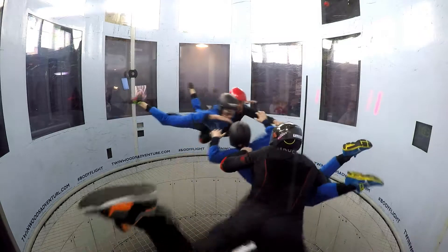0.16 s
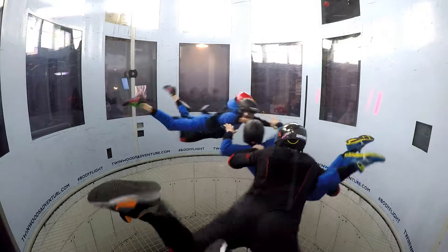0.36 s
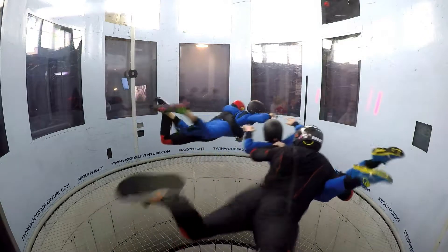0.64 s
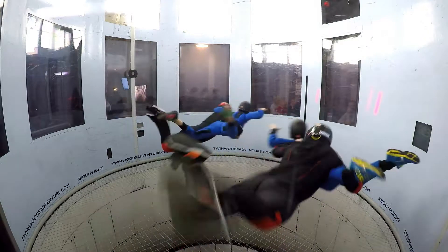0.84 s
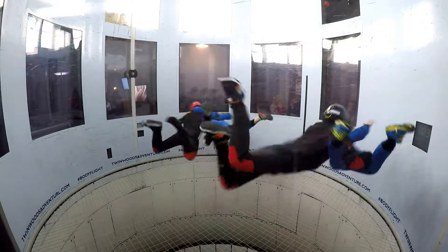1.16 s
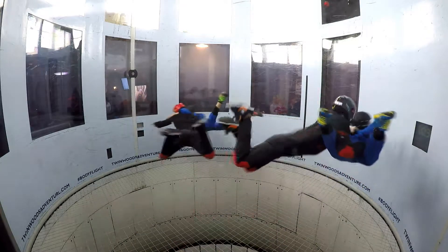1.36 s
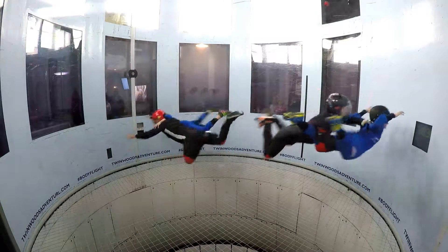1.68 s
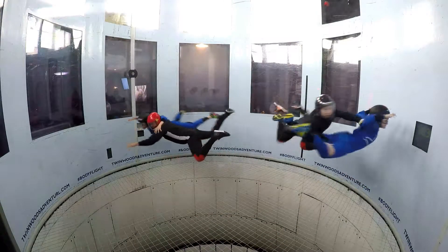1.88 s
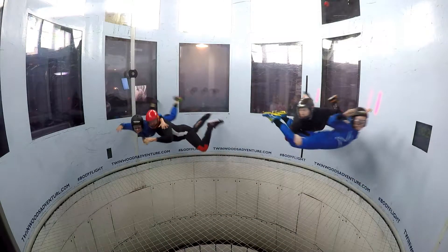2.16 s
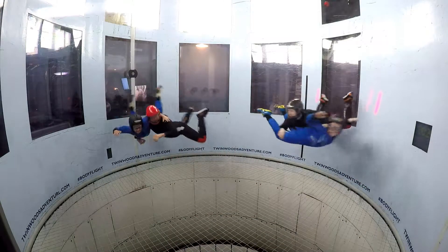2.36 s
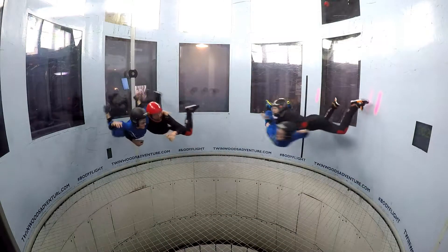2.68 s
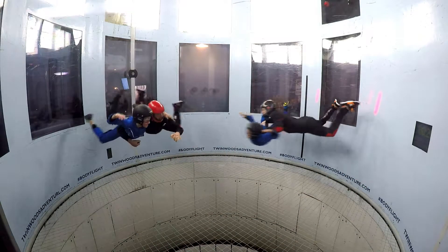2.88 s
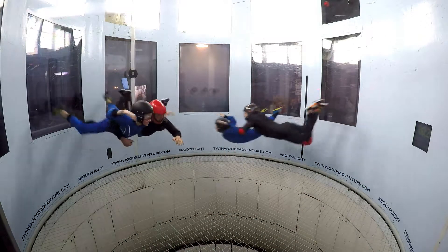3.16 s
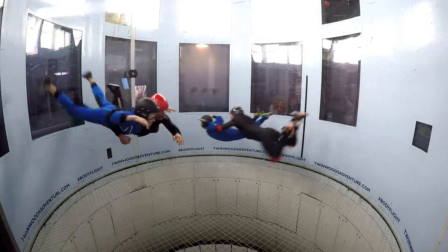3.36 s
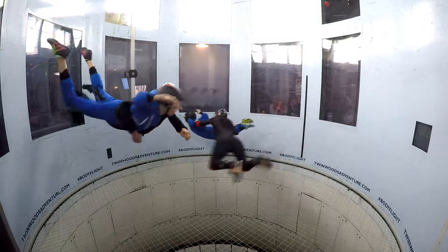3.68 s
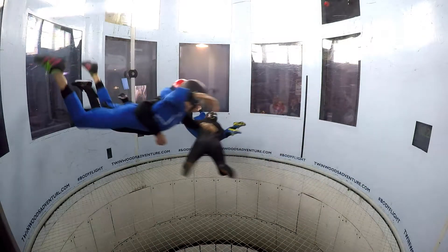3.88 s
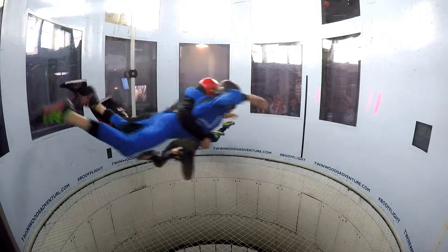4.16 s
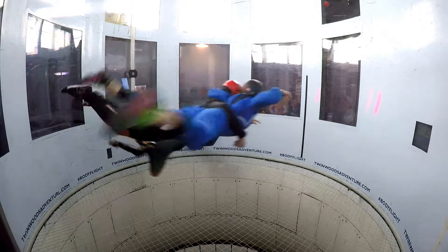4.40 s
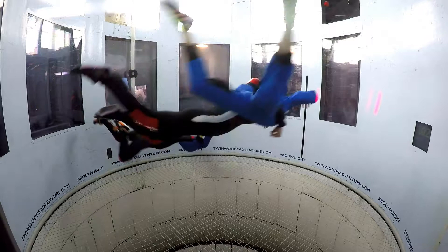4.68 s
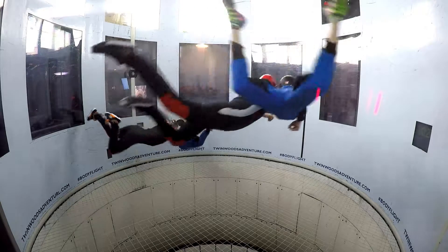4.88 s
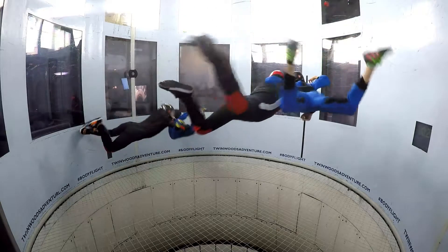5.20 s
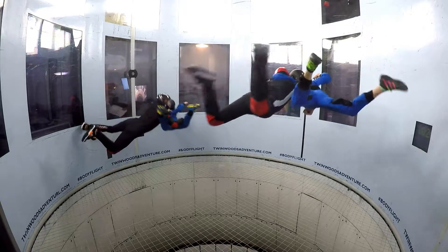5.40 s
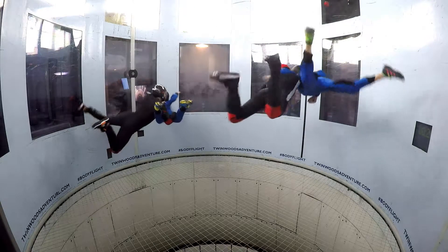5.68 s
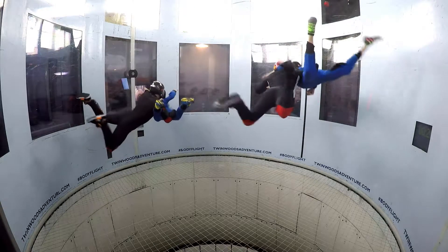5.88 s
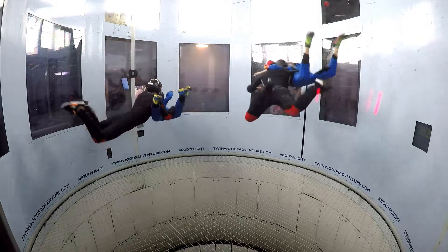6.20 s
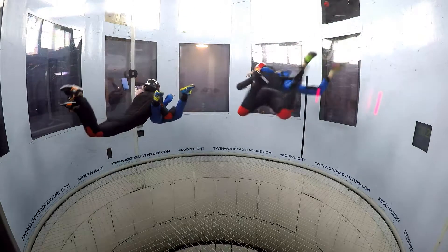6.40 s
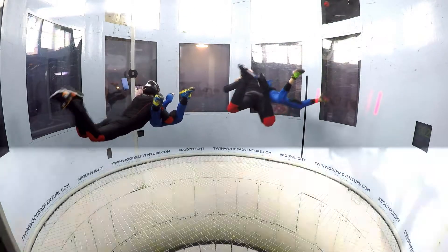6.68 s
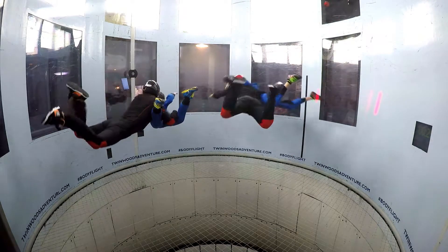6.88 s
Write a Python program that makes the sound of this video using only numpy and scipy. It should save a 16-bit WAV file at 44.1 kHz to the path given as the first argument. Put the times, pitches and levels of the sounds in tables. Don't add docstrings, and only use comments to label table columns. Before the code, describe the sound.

A vertical wind tunnel is already at full power at 0 s, its dense, dark airflow roaring continuously until the end at about 7 s. Underneath, large fans make a very deep drone with a weaker octave that pulses irregularly. The hum dips near 0.4 and 1.4 s, surges around 1.6 to 2.1 s, thins near 2.5 s, then becomes strong and fuller from about 4.8 s, briefly weakening around 6.1 s. Uneven gusts thump the wall, heaviest near 2.2 and 3.7 s, with others near 4.3 and 6.7 s. A hollow, noisy wall resonance booms and lulls, prominent around 0.7, 2.8, 3.4 to 3.8, 6.5 and 6.95 s. Passing flyers slightly stir the hiss near 1.9, 4 and 5.9 s. The cased wall microphone sounds muffled and compressed, with thin treble and an almost inaudible rapid electrical blip.

```python
import sys
import numpy as np
from scipy import signal
from scipy.fft import rfft, irfft
from scipy.io import wavfile
from scipy.ndimage import uniform_filter1d, minimum_filter1d

SR = 44100
rng = np.random.default_rng(int(sys.argv[2]) if len(sys.argv) > 2 else 0)


def natural_amplitude(level_db):
    exponent = np.asarray(level_db, float) / 20
    return 10 ** exponent


def output_pcm(signal):
    pcm = np.clip(np.atleast_2d(signal).T, -1, 1) * 32767
    wavfile.write(sys.argv[1], SR, np.round(pcm).astype(np.int16))


N = 310905

# time in seconds, level in dB.
BLADE_LEVELS = [(0.0, -21), (0.1, -17.5), (0.43, -31), (0.7, -22), (1.3, -23), (1.43, -40), (1.6, -16.5),
                (1.74, -23), (1.92, -17), (2.14, -17.5), (2.45, -25.5), (3.5, -19), (3.8, -25),
                (4.18, -20.5), (4.32, -27), (4.85, -15.5), (5.9, -15), (7.05, -18.5)]


def in_time(rows):
    s, *columns = np.transpose(rows)
    return [np.interp(np.arange(N) / SR, s, column) for column in columns]


def rms_one(x):
    return x / np.sqrt(np.mean(x ** 2) + 1e-20)


def drift(rate_hz):
    pole = np.exp(-80 * np.pi * rate_hz / SR)
    noise = rng.standard_normal(N // 40 + 4002)
    slow = signal.lfilter([1], [1, -2 * pole, pole * pole], noise)[4000:]
    slow = rms_one(slow - slow.mean())
    return np.interp(np.arange(N) / 40, np.arange(len(slow)), slow)


def bumps(rows, half_s):
    s, height = np.transpose(rows)
    coarse_s = np.arange(0, N, 50) / SR
    bells = height @ np.exp(-0.5 * ((coarse_s - s[:, None]) / half_s) ** 2)
    return np.interp(np.arange(N) / SR, coarse_s, bells)


def load(events, half_s, calm_db):
    swells = bumps([(s, natural_amplitude(2 * db)) for s, db in events], half_s)
    return np.sqrt(natural_amplitude(2 * calm_db) + swells)


def evened(x, span_s, share):
    size = int(span_s * SR)
    power = uniform_filter1d(uniform_filter1d(x ** 2, size), size)
    return rms_one(x / (power + 1e-3) ** (share / 2))


def above(hz, edge_hz, order):
    return 1 / (1 + (edge_hz / hz) ** order)


def frame_blips():
    blip_hz, blip_db, blip_s = 8550, -66.5, 0.0065
    frame_s, first_s = 0.04, 0.0252
    since = (np.arange(N) / SR - first_s + frame_s / 2) % frame_s - frame_s / 2
    burst = np.cos(np.pi * np.clip(since / blip_s, -0.5, 0.5))
    return natural_amplitude(blip_db) * burst * np.sin(2 * np.pi * blip_hz * since + 0.5 * drift(8.0))


def fans():
    blade_hz = 62.5
    # multiple of the blade rate, level in dB rms.
    fan_tones = [
        (1 / 6, -26),
        (3, -45.5),
        (5, -39),
        (6, -38.5),
        (14, -56),
    ]
    # time in seconds, depth in dB.
    blade_dips = [
        (3.1, -5.5),
        (6.06, -10),
        (6.5, -5.5),
    ]
    # time in seconds, peak in dB.
    octave_swells = [(0.22, -29), (0.55, -29.5), (0.95, -29.5), (1.27, -26), (1.58, -28.5), (1.92, -29.5),
                     (2.13, -28), (2.72, -31), (3.2, -28), (3.5, -31), (3.73, -26.5), (4.52, -28.5),
                     (4.82, -30), (5.18, -32), (5.8, -35.5), (6.12, -29.5), (6.4, -31.5), (6.55, -30.5),
                     (6.8, -34)]

    blade_db = in_time(BLADE_LEVELS)[0] + bumps(blade_dips, half_s=0.064)
    octave_db = 20 * np.log10(load(octave_swells, half_s=0.054, calm_db=-42))
    turn = 2 * np.pi * blade_hz * np.arange(N) / SR
    tones = [(1, blade_db + 0.5), (2, octave_db)] + fan_tones
    out = np.zeros(N)
    for multiple, level_db in tones:
        wander = 0.73 * np.sqrt(multiple) * drift(0.7) + rng.uniform(0, 2 * np.pi)
        gain = np.sqrt(2) * natural_amplitude(level_db + 0.29 * drift(2.2))
        out += gain * np.sin(multiple * turn + wander)
    return out


def shaken_wall():
    # frequency in Hz, level in dB per Hz.
    through_wall = [(9, -23.5), (20, -22), (45, -29), (90, -44.5), (150, -43.5), (280, -44.5), (480, -49),
                    (760, -60.5), (1500, -65), (2300, -74.5), (4100, -80), (5400, -86.5), (8000, -96),
                    (14000, -103)]
    # centre in
    # Hz, width in Hz, height in dB (negative for a dip).
    resonances = [(26, 11, 7.5), (56.2, 14, 9.5), (76.2, 15, 9), (102, 10, 7), (118.3, 11, 8),
                  (187.9, 30, 9), (238.2, 31, 8), (288, 15, -6), (351.3, 32, 21.5), (368.3, 15.3, 14.5),
                  (380.8, 16, -9), (400.7, 27.1, 12.5), (434, 36, 12), (503, 22, 1), (583.3, 46, 15.5),
                  (717, 16, 5.5),
                  (877, 50, 10), (960, 160, 11), (1103, 64, 6), (1145, 25, -6), (1203, 15, -7.5),
                  (1310, 71, 7), (1645, 60, 5.5), (2003, 91, 13), (2206, 190, 6.5), (3150, 320, 7.5),
                  (3710, 370, 9), (4544, 690, 14.5), (6220, 780, 4),
                  (43, 9.7, -5.5), (146, 18, -2), (237, 7.3, -3.5), (472, 24, -5.5), (560, 14, -3.5),
                    (746, 41, -7), (830, 7.6, -3), (1196, 14, 6.5), (1796, 200, 4.5), (2290, 90, -5),
                    (4080, 130, -3), (4930, 280, 5.5), (5450, 530, -2),
                  (33, 6, 4),
        (500, 22, 3),
        (642, 15, 6.5),
        (661, 14, -3),
        (686, 17, 6),
    ]

    hz = np.maximum(np.fft.rfftfreq(N, 1 / SR), 1)
    points = np.array(through_wall)
    colour_db = np.interp(np.log(hz), np.log(points[:, 0]), points[:, 1])
    for mode_hz, width_hz, mode_db in resonances:
        colour_db = colour_db + mode_db / (1 + (2 * (hz - mode_hz) / width_hz) ** 2)
    colour_db = colour_db - 6 * above(hz, 14250, order=400)
    turbulence = rfft(rng.standard_normal(N))
    return hz, turbulence * natural_amplitude(colour_db) * above(hz, 7.6, order=8)


def airflow():
    # time in seconds, peak in dB.
    gusts = [(0.36, -14.5), (0.64, -18.5), (1.05, -16.5), (1.29, -14.5), (1.48, -17), (1.59, -14.5),
             (1.96, -13), (2.07, -19), (2.17, -9.5), (2.44, -12.5), (2.61, -13.5), (2.7, -14.5),
             (2.97, -15), (3.11, -14.5), (3.28, -13.6), (3.4, -16), (3.68, -9.5), (3.93, -17),
             (4.29, -12.5), (4.59, -15.5), (5.46, -16), (5.82, -17), (6.71, -12.5), (6.82, -14)]
    # time in seconds, peak in dB.
    boom_peaks = [(0.01, -15.5), (0.56, -16.5), (0.66, -12), (1.05, -15), (1.17, -15.5), (1.54, -15),
                  (1.8, -17.5), (2.66, -19.5), (2.79, -11.5), (2.95, -12.5), (3.39, -11.5), (3.7, -11),
                  (3.77, -12), (4.04, -13), (4.32, -16), (4.5, -16), (4.66, -18), (4.9, -17.5), (5.01, -18),
                  (5.14, -19.5), (5.31, -15.1), (5.48, -18.5), (5.62, -21), (5.8, -17), (6.46, -12.5),
                  (6.6, -17), (6.78, -14.3), (6.95, -11), (7.03, -14)]
    # time in seconds, depth in dB.
    boom_lulls = [(0.05, -4.5), (0.3, -5.5), (1.11, -8.5), (1.66, -6.5), (2.1, -10), (2.2, -8.5),
                  (2.58, -7), (3.33, -4.5), (5.06, -6.5), (6.05, -8.5), (6.84, -3.5)]
    # time in seconds, rise in dB.
    wakes = [
        (1.88, 1.5),
        (2.14, 1),
        (3.96, 1),
        (5.9, 1),
    ]

    blade_db, = in_time(BLADE_LEVELS)
    yields_db = 0.45 * np.maximum(blade_db + 20.5, 0)
    calm_buffet_db = -19.5 - yields_db + 1.5 * drift(8.6)
    thump_load = load(gusts, half_s=0.03, calm_db=calm_buffet_db)
    calm_boom_db = -19 + bumps(boom_lulls, half_s=0.026) + 0.76 * drift(6.0)
    boom_load = load(boom_peaks, half_s=0.019, calm_db=calm_boom_db)

    hz, spectrum = shaken_wall()
    over_low = above(hz, 45, order=12)
    over_middle = above(hz, 325, order=40)
    over_wall = above(hz, 388, order=40)
    shares = [1 - over_low, over_low * (1 - over_middle), over_middle * (1 - over_wall), over_wall]
    buffet, middle, wall, roar = [rms_one(irfft(spectrum * share, N)) for share in shares]

    buffet = natural_amplitude(-0.8) * thump_load * evened(buffet, span_s=0.033, share=0.68)
    middle = natural_amplitude(-23.5 + 0.67 * drift(1.0)) * middle
    wall = natural_amplitude(-1.22) * boom_load * evened(wall, span_s=0.05, share=0.63)
    roar = natural_amplitude(-26.5 + bumps(wakes, half_s=0.03) + 0.5 * drift(1.5)) * roar
    return buffet + middle + wall + roar


def scene():
    return (fans() + airflow())[None]


def limiter(x, ceiling_db, release_db_per_s, attack_s):
    over_db = np.maximum(20 * np.log10(np.abs(x) + 1e-9) - ceiling_db, 0)
    climb_db = release_db_per_s * np.arange(N) / SR
    held_db = np.maximum.accumulate(over_db + climb_db) - climb_db
    size = int(attack_s * SR) + 1
    ahead_db = -minimum_filter1d(-held_db, size)
    return x * natural_amplitude(-uniform_filter1d(ahead_db, size))


def sagging_top(x, flicker_db):
    edges_hz = [10300, 11200, 12000, 12800, 13500, 14250, 16000]
    together = drift(40.0)
    out = x.copy()
    for low_hz, high_hz in zip(edges_hz, edges_hz[1:]):
        band_filter = signal.butter(3, [low_hz, high_hz], "band", fs=SR, output="sos")
        band = signal.sosfiltfilt(band_filter, x)
        sag = np.minimum(0.4 * together + drift(30.0), 0.6)
        out += band * (natural_amplitude(flicker_db * sag) - 1)
    return out


def low_pass(x):
    return signal.sosfilt(signal.butter(12, 15295, fs=SR, output="sos"), x)


def record(dry):
    held = limiter(dry[0], ceiling_db=-2.1, release_db_per_s=40, attack_s=0.003)
    held = held * np.clip(0.35 + np.arange(N) / SR / 0.008, 0, 1)
    line = sagging_top(held + frame_blips(), flicker_db=3.5)
    return low_pass(line[None])


dry = scene()
out = record(dry)
output_pcm(out)
```